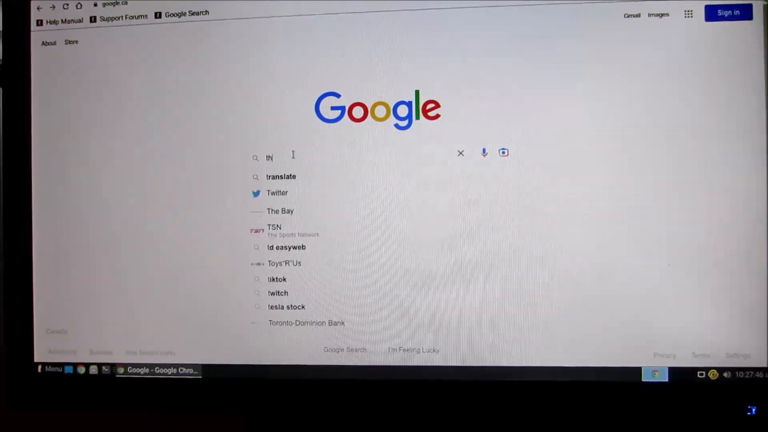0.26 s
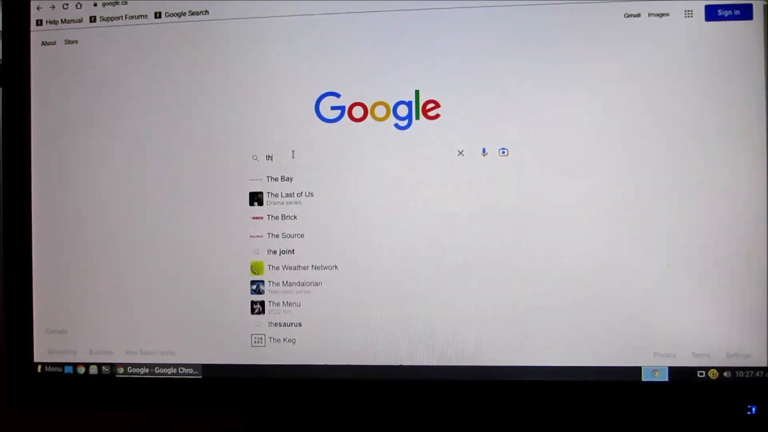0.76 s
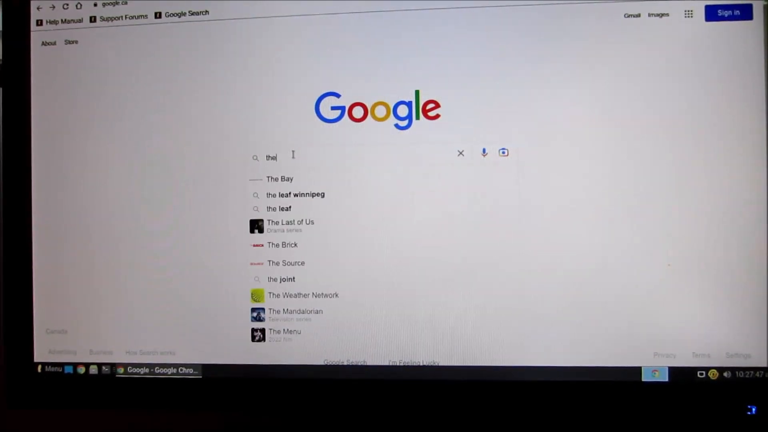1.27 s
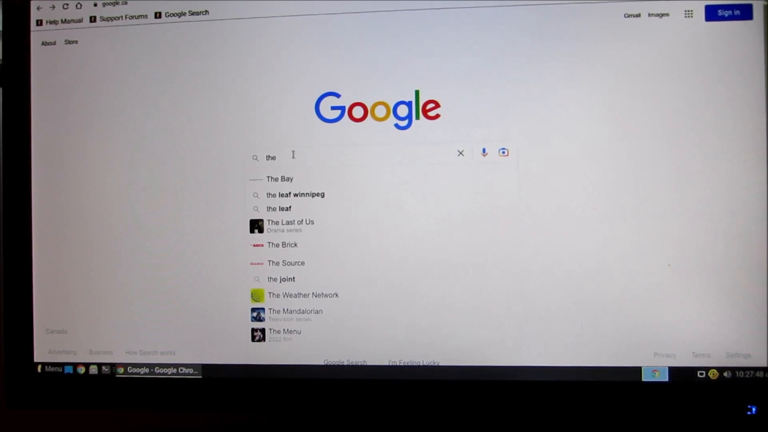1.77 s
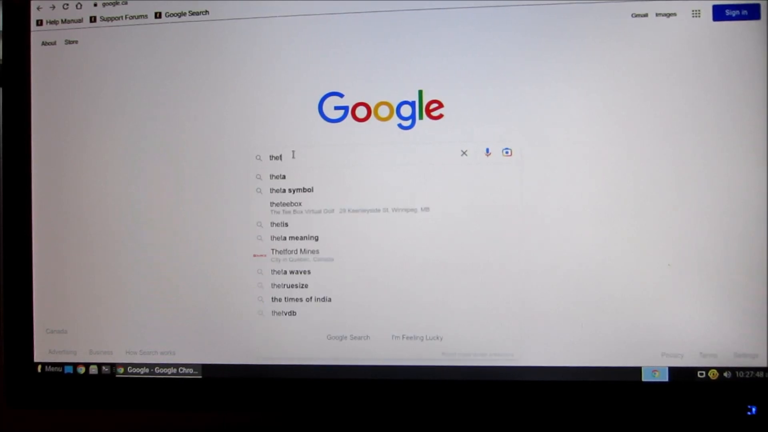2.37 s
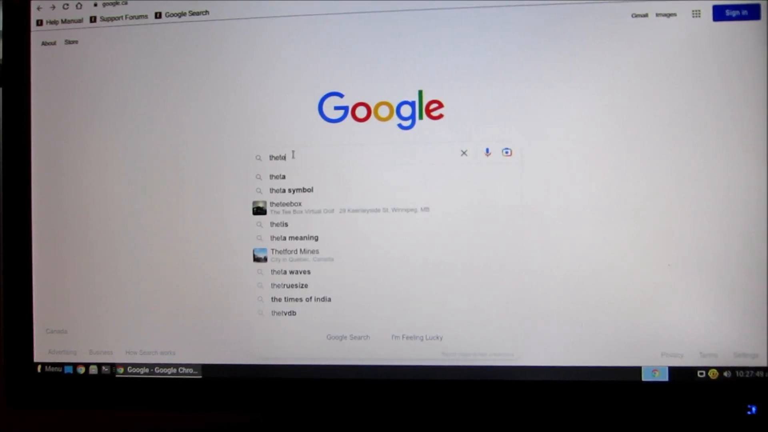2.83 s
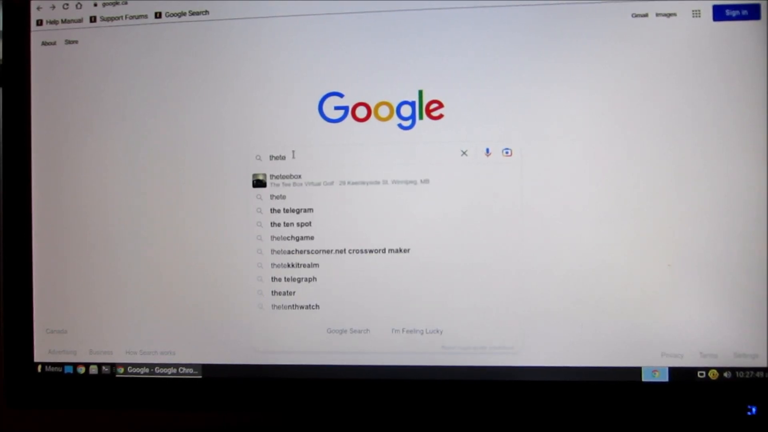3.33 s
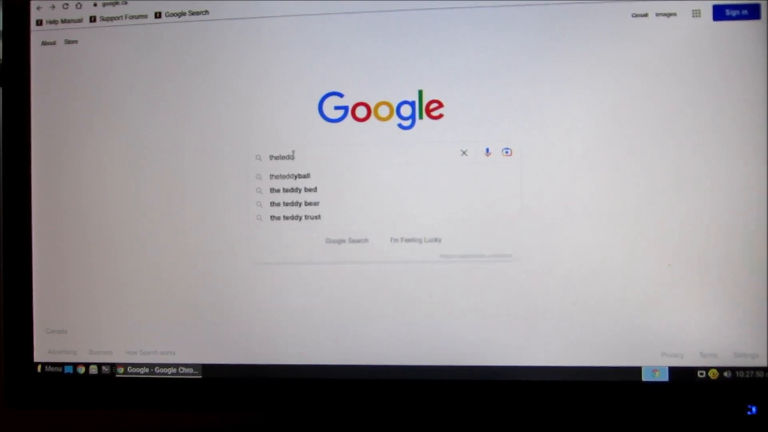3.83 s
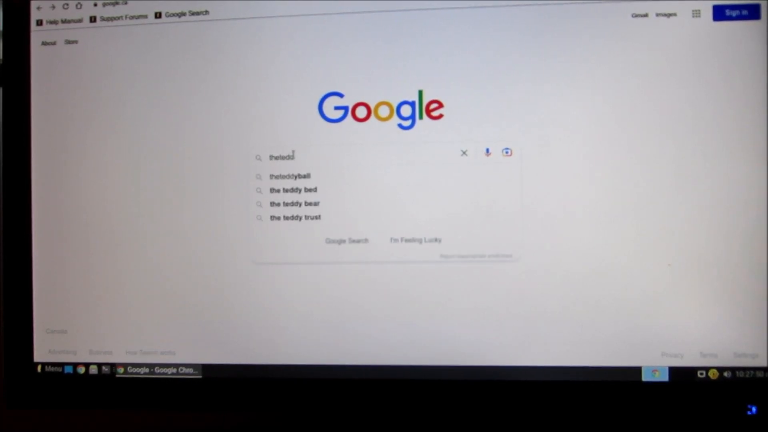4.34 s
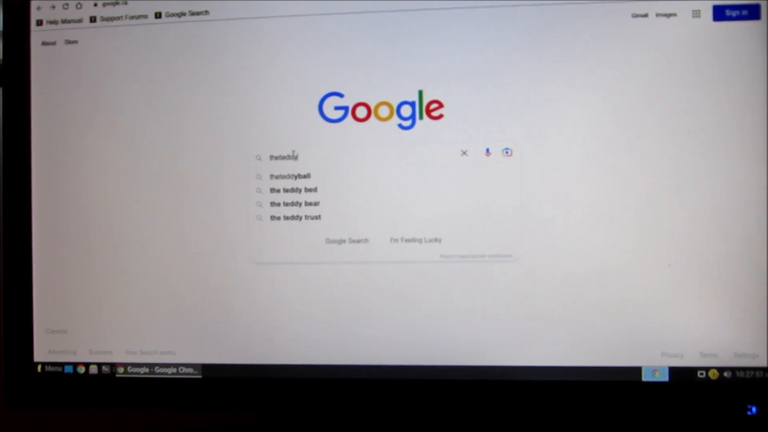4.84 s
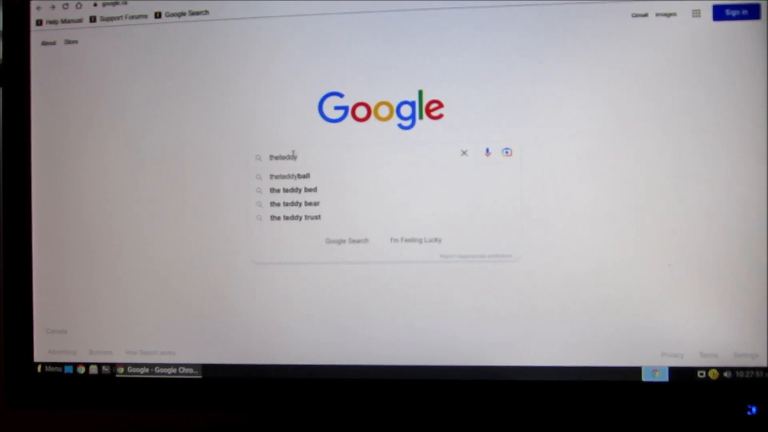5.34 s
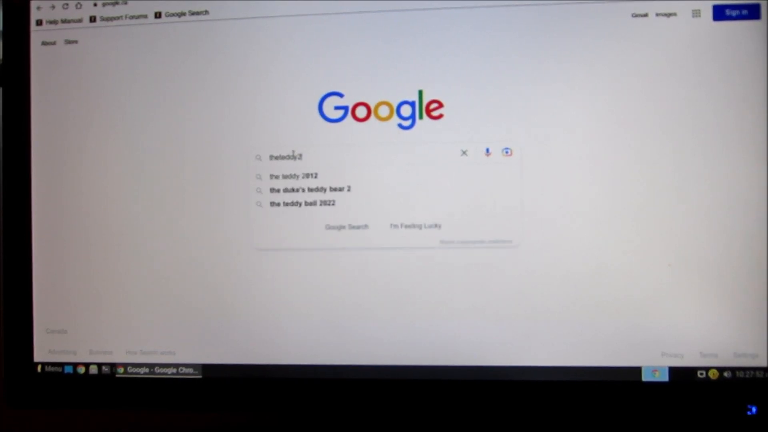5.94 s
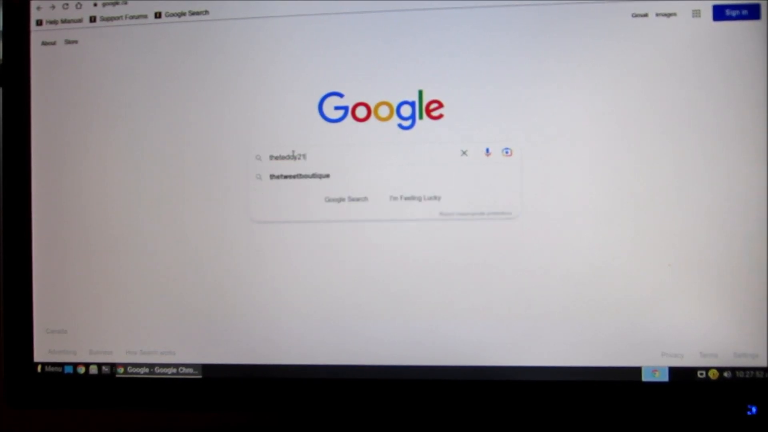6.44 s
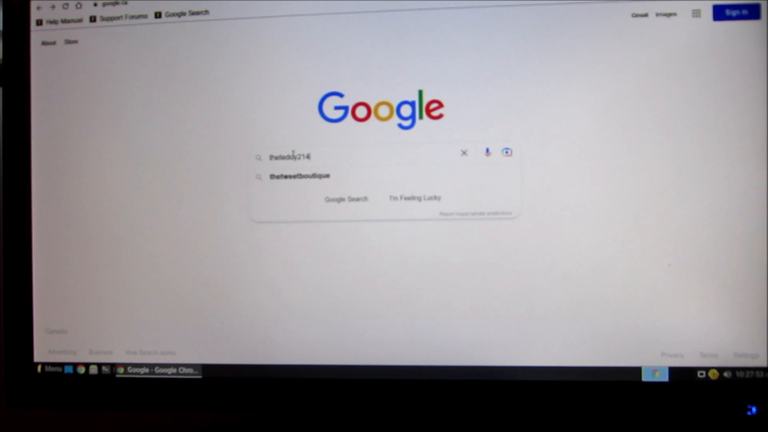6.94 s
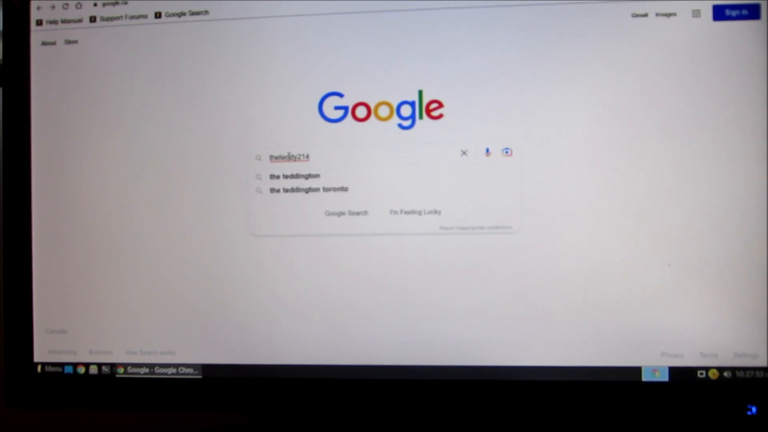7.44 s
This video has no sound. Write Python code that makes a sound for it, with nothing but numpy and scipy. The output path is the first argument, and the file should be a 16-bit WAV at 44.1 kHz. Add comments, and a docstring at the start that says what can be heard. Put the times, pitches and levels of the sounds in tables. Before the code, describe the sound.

Slow, uneven typing indoors: short plastic clacks, each booming faintly through the desk and followed about a tenth of a second later by a fainter release click. About one second in, something bumps the desk in a rapid stutter, thudding and rattling louder than the keys. Long gaps expose low fan noise, faint hiss and hum. Close, dry and slightly left of centre.

```python
"""Slow typing and a knocked desk

One finger types slowly on a plastic keyboard on a desk in a small room, with a computer fan running.
Each key is a sum of decaying case and cap modes with a noise tick; desk modes add a thump, and about
a tenth of a second later the key returns with a softer clack. Near the start something bumps the desk
and judders in a few near-even slips: a dull, louder knock of low modes, with loose parts rattling.
Fan and hiss are spectrally shaped noise; hum and whine are sines of wandering phase."""
import sys
import numpy as np
from scipy import signal
from scipy.fft import rfft, irfft
from scipy.io import wavfile

SR = 44100
rng = np.random.default_rng(int(sys.argv[2]) if len(sys.argv) > 2 else 0)


def log_audio(samples):
    """Write samples as a 16-bit WAV file to the path given in sys.argv[1]."""
    # one column per channel
    frames = np.atleast_2d(samples).T
    # limit to full scale, then quantise
    limited = np.clip(frames, -1, 1)
    pcm = np.round(limited * 32767).astype(np.int16)
    wavfile.write(sys.argv[1], SR, pcm)


N = 339570
BLOW = np.arange(int(.7 * SR)) / SR  # time axis of one blow, s

# Keystrokes, timed at bottoming out; the lead is how long before that the finger is heard meeting the cap
# (0 = unheard): t/s, case level/dB, cap level/dB, tick level/dB, case centre f/Hz, left-right level/dB,
# thump level/dB, sway level/dB, lead t/s, held t/s, return level/dB
KEYSTROKES = [(.166, -47, -53, -66, 1300, 2, -45.5, -57, 0, .101, -62),
              (0.1956, -45.5, -54.5, -63.5, 1000, 3, -72, -56, 0, 0.092, -54),
              (0.8234, -47.5, -48.5, -58.5, 1220, 3.5, -43, -49, 0.0047, 0.083, -55),
              (2.131, -49, -63, -61.5, 905, 3, -47.5, -49.5, 0.003, 0.099, -55),
              (2.7211, -46.5, -47, -54.5, 1390, 3, -41.5, -52, .027, 0.099, -53.5),
              (3.4684, -48, -51, -52.5, 1160, 4.5, -39.5, -50, 0.016, .1, -62),
              (3.6574, -49.5, -48, -51, 1216, 5.5, -39.5, -54, 0.014, .1096, -63),
              (4.7268, -49.5, -53, -58, 1510, 6.5, -48, -48.5, 0.0048, .1, -57),
              (5.6861, -44, -51, -65, 1470, 2.5, -39, -57, 0.009, 0.086, -61),
              (6.226, -54, -59.5, -66, 1000, 5, -43.5, -59, 0.0031, 0.1, -58),
              (6.804, -49.5, -52, -64, 1230, 4, -51.5, -59, 0, .1, -50.5)]
# Sharp tick of plastic on plastic, relative spectral density: f/Hz, level/dB per Hz
TICK_SPECTRUM = [(1500, -32), (3500, 4), (4800, -2), (5500, -1), (6200, 0.5), (7000, 1.5), (8000, -4),
                 (10000, -18), (12000, -35), (14000, -26)]


def key_clacks():
    """Impact and release: the finger meets the cap, drives it to the bottom, holds it and lets it spring back."""
    # one last light tap: t/s, case level/dB, cap level/dB, tick level/dB, case centre f/Hz, left-right level/dB
    light_tap = (7.368, -52, -65, -71, 1280, -1)
    touch_db, touch_tick_db = -9, -13  # first touch against the stroke: softer ring, still softer tick
    out = np.zeros((2, N))
    for s, case_db, cap_db, tick_db, centre_hz, left_db, _, _, lead_s, held_s, return_db in KEYSTROKES:
        add(out, s, clack(case_db, cap_db, tick_db, centre_hz, left_db))
        # cap and tick of the return are relative to its case
        key_return = clack(case_db=0, cap_db=-6.5, tick_db=-13.5, centre_hz=1000, left_db=5)
        add(out, s + held_s, from_db(return_db) * key_return)
        if lead_s > 0:
            touch = clack(case_db + touch_db, cap_db + touch_db, tick_db + touch_tick_db, centre_hz, left_db)
            add(out, s - lead_s, touch)
    add(out, light_tap[0], clack(*light_tap[1:]))
    return room(out, wet_db=-8, build_s=0.003)


def clack(case_db, cap_db, tick_db, centre_hz, left_db):
    """Modal excitation: a landing cap ticks, seats and rocks; the case rings most near the key's own centre."""
    # keyboard case modes: f/Hz, level/dB, t60/s
    case_modes = [(492, -1.5, 0.03), (615, -4, 0.034), (842, -3.5, 0.028), (1018, -3, 0.031),
                  (1150, -9.5, 0.076), (1320, -1.5, 0.034), (1373, -5, 0.044), (1510, -21, 0.035),
                  (1685, -2, 0.024)]
    # key cap modes: f/Hz, level/dB, t60/s
    cap_modes = [(1857, -6.5, 0.041), (2130, -1, 0.029), (2357, 1, 0.028), (2627, -6, 0.032),
                 (3130, -11.5, 0.029), (3470, -11, 0.02)]
    # bright crack that starts the tick, relative spectral density: f/Hz, level/dB per Hz
    crack_spectrum = [(1500, -25), (3500, 0), (6400, 2), (9000, -9), (12000, -32), (14500, -25)]
    crack_db, crack_t60 = 4, .0075  # dB relative to the tick, s

    # modes lose 10 dB one octave from the centre, growing with the square of the distance
    modes = [(hz, db - 10.0 * np.log2(hz / centre_hz) ** 2, t60) for hz, db, t60 in case_modes]
    out = np.zeros((2, len(BLOW)))
    for s, db in [(0, 0), (0.00352, -3.5), (.014, -10)]:  # landing, seating, rocking: s, dB
        ring = hard_blow(modes, detune=0.022, vary_db=1.2, apart=0.24, rise_s=0.00057)
        add(out, s, from_db(case_db + db) * ring)
    cap = from_db(cap_db) * hard_blow(cap_modes, detune=0.037, vary_db=1.5, apart=0.44, rise_s=0.00065)
    tick = burst(TICK_SPECTRUM, t60=0.017, tail_db=-5.5, tail_t60=.08)
    noise = rng.standard_normal((2, len(BLOW)))
    crack = from_db(crack_db) * colour(noise, crack_spectrum) * fade(crack_t60)
    return (out + cap + from_db(tick_db) * (tick + crack)) * panned(left_db)


def key_thumps():
    """Structure-borne sound: each stroke makes the desk boom and sway; the lifting finger booms it faintly."""
    # desk modes under the keyboard: f/Hz, level/dB, t60/s
    desk_modes = [(118.3, -4, 0.71), (134.6, -6.5, 0.14), (164, -4, 0.23), (181.4, -19, 0.23),
                  (264.3, -12, 0.35)]
    # slow sway of the desk on its legs: f/Hz, level/dB, t60/s
    sway_modes = [(59.7, -5.5, 1), (76.4, -14, .3)]
    boom_lag_s, sway_lag_s = 0.00407, 0.011  # after bottoming out
    lift_db = -12  # relative to the stroke's thump
    out = np.zeros((2, N))
    boom = soft_blow(desk_modes, contact_hz=332, radiate_hz=96)
    sway = soft_blow(sway_modes, contact_hz=110, radiate_hz=44.8)
    for s, *_, thump_db, sway_db, _, held_s, _ in KEYSTROKES:
        add(out, s + boom_lag_s, from_db(thump_db) * boom)
        add(out, s + sway_lag_s, from_db(sway_db) * sway)
        add(out, s + held_s, from_db(thump_db + lift_db) * boom)
    return out * panned(1.0)


def knock_thuds():
    """Stick-slip: a grazing slip, slightly weakening full slips to a hard stop, then fast-dying after-shakes."""
    # heavy, low modes of the bumped furniture: f/Hz, level/dB, t60/s
    thud_modes = [(128, -15, .12), (171, -7.5, .075), (201, -6.5, 0.091), (227, -3.5, 0.097),
                  (249.8, -8.5, 0.16), (276, -23.5, .2), (370, -14.5, .09), (416, -24, 0.18)]
    stop_s, stop_slip_db = .9788, -26  # time and level of the last full slip, slip 0
    slip_s, jitter_s = .0245, 0.00057  # spacing of the slips, unevenness of every contact
    weaken_db, settle_db = 0.7, 17  # loss per slip: before the stop, after it
    graze_db, stop_db = -7.5, 8  # change of the first slip, extra of the hard stop
    rebound_s, rebound_loss_db = 0.00754, 2.5  # spacing, loss per rebound
    out = np.zeros((2, N))
    thud = soft_blow(thud_modes, contact_hz=344, radiate_hz=115)
    for slip in range(-3, 3):
        slip_db = stop_slip_db + min(-weaken_db * slip, -settle_db * slip) + graze_db * (slip == -3)
        for rebound in range(3):  # the slip itself, then two rebounds
            db = slip_db - rebound_loss_db * rebound + stop_db * (slip == rebound == 0)
            s = stop_s + slip_s * slip + rebound_s * rebound + jitter_s * rng.standard_normal()
            add(out, s, from_db(db) * thud)
    return room(out * panned(1.3), wet_db=-14, build_s=0.026)


def knock_rattle():
    """Repeated micro-impacts: while the judder lasts, loose parts chatter unevenly and the surface is scuffed."""
    # loose, light parts: f/Hz, level/dB, t60/s
    loose_modes = [(657, 1.5, 0.078), (765, -2, 0.037), (973, -1, 0.031), (1240, 1, 0.047),
                   (1370, 1.5, 0.042), (1596, 0.5, 0.07), (1664, -3, 0.088), (2094, -5.5, 0.062),
                   (2630, -20, 0.078)]
    # how hard the knock shakes and scuffs: t/s, rattle level/dB before the trim below, scuff level/dB
    shake = [(0.902, -58, -76), (0.914, -49, -75), (0.938, -44, -63.5), (0.956, -43, -73),
             (0.97, -36.5, -69), (0.99, -43, -67), (1.0, -51, -73)]
    rattle_trim_db = -6.5
    contacts_per_s = 260
    out = np.zeros((2, N))
    times, rattle_db, scuff_db = np.transpose(shake)
    for due in np.arange(times[0], times[-1], 1 / contacts_per_s):
        s = due + rng.uniform(-.5, .5) / contacts_per_s
        rattle = hard_blow(loose_modes, detune=0.028, vary_db=0.5, apart=0.16, rise_s=.001)
        scuff = burst(TICK_SPECTRUM, t60=.04, tail_db=-12, tail_t60=0.11)
        rattle = from_db(rattle_trim_db + np.interp(s, times, rattle_db)) * rattle
        scuff = from_db(np.interp(s, times, scuff_db)) * scuff
        add(out, s, rattle + scuff)
    return room(out * panned(4.0), wet_db=-8, build_s=0.0058)


def computer():
    """Broadband and tonal noise: fan rush, faint hiss, and hum and whine whose phase walks at random."""
    # fan and room air, relative spectral density: f/Hz, level/dB per Hz
    fan_spectrum = [(12, -39), (20, 0), (38, -9), (87, -8.5), (121, -5.5), (144, -5), (253, -6.5),
                    (354, -9), (549, -10), (649, -9.5), (947, -14.5), (1190, -11), (2240, -18.5),
                    (2430, -23.5), (3000, -27.5), (3900, -61), (6600, -120)]
    # resonances that colour the rush: f/Hz, width f/Hz, level/dB
    fan_peaks = [(262, 56, 4.5), (1186, 91, 2), (1398, 100, -3), (1690, 68, 5.5), (1934, 380, -4),
                 (2187, 230, 3.5)]
    # fine hiss above it, relative spectral density: f/Hz, level/dB per Hz
    hiss_spectrum = [(1760, -26), (3000, -5.5), (3170, -0.5), (3450, -5), (3830, -3), (4310, -7),
                     (6090, -9), (7250, -10.5), (10300, -19), (12000, -35.5), (13400, -23), (15100, -18.5),
                     (15800, -23.5)]
    # steady tones: f/Hz, rms level/dB
    tones = [(30, -74), (59.5, -82), (120, -67), (1394, -71.5), (3289, -82), (4738, -89.5)]
    out = steady_noise(fan_spectrum, -56, fan_peaks) + steady_noise(hiss_spectrum, -72, [])
    time = np.arange(N) / SR
    for hz, db in tones:
        # phase drifts 2.71 rad rms in one second, independently on each side
        wander = np.cumsum(rng.standard_normal((2, N)), axis=1) * 2.71 / np.sqrt(SR)
        out = out + from_db(db) * np.sqrt(2) * np.sin(2 * np.pi * hz * time + wander)
    return out


def steady_noise(spectrum, level_db, peaks):
    """Partial coherence: mid and side noises set the likeness of the sides; the level is the mid channel's rms."""
    # left-right correlation of the background: f/Hz, likeness (-1 to 1)
    likeness = [(30, -0.5), (120, -0.63), (280, -0.27), (640, -0.71), (1400, -0.48), (3100, -0.48),
                (6800, 0.057), (15000, .1)]
    # left-right balance of the background: f/Hz, level/dB
    balance = [(30, -1), (120, -1.5), (280, 0), (640, -0.5), (1400, -5), (2800, -2), (5600, -0.3),
               (15000, .5)]
    hz = np.fft.rfftfreq(N, 1 / SR)
    shape_db = at_hz(spectrum, hz)
    for centre, width, db in peaks:
        shape_db = shape_db + db / (1 + (2 * (hz - centre) / width) ** 2)
    alike = np.clip(at_hz(likeness, hz), -.95, .95)
    white = rfft(rng.standard_normal((2, N)))
    mid, side = white * from_db(shape_db) * np.sqrt([1 + alike, 1 - alike])
    lean = from_db(at_hz(balance, hz) / 2)
    sides = irfft(np.array([(mid + side) * lean, (mid - side) / lean]), N)
    return from_db(level_db) * sides / np.std(irfft(mid, N))


def room(x, wet_db, build_s):
    """Diffuse reverberation: a noise tail, different on each side, builds up and dies band by band."""
    # reverberation time: f/Hz, t60/s
    room_t60 = [(100, 0.33), (400, 0.18), (1500, 0.25), (6000, 0.17), (15000, 0.24)]
    tail, edges = 0, np.geomspace(70, 16000, 9)
    for low, high in zip(edges, edges[1:]):
        band_pass = signal.butter(2, [low, high], "band", fs=SR, output="sos")
        band = signal.sosfilt(band_pass, rng.standard_normal((2, len(BLOW))))
        tail = tail + band * fade(at_hz(room_t60, np.sqrt(low * high)))
    tail = tail * (1 - np.exp(-BLOW / build_s))
    tail = tail / np.sqrt(np.sum(tail[0] ** 2))
    return x + from_db(wet_db) * signal.fftconvolve(x, tail, axes=1)[:, :N]


def hard_blow(modes, detune, vary_db, apart, rise_s):
    """Modal sum in stereo: each blow varies its light modes' pitch and strength, out of step on the two sides."""
    out = 0
    for hz, db, t60 in modes:
        tune, strength, step = rng.standard_normal(3)
        phase = 2 * np.pi * (hz * (1 + detune * tune) * BLOW + rng.random())
        sides = phase + apart * step * np.array([[1], [-1]])
        out = out + from_db(db + vary_db * strength) * fade(t60) * np.sin(sides)
    out = out * (1 - np.exp(-BLOW / rise_s))
    return out / np.sqrt(np.mean(out[:, BLOW < .01] ** 2))  # unit rms over the first 10 ms


def soft_blow(modes, contact_hz, radiate_hz):
    """Soft contact low-passes the push on low modes; a panel this small moves no air in the deepest bass."""
    sound = sum(from_db(db) * fade(t60) * np.cos(2 * np.pi * hz * BLOW) for hz, db, t60 in modes)
    sound = signal.sosfilt(signal.butter(3, contact_hz, fs=SR, output="sos"), sound)
    return signal.sosfilt(signal.butter(3, radiate_hz, "high", fs=SR, output="sos"), sound)


def burst(spectrum, t60, tail_db, tail_t60):
    """Two-rate decay: stereo chatter of tiny contacts dies fast and leaves a fainter, longer tail."""
    noise = colour(rng.standard_normal((2, len(BLOW))), spectrum)
    return noise * (fade(t60) + from_db(tail_db) * fade(tail_t60))


def fade(t60):
    """Exponential damping: the envelope of one blow falls 60 dB in t60 seconds."""
    return np.exp(-np.log(1000) * BLOW / t60)


def colour(x, spectrum):
    """Spectral shaping: white noise takes on a spectrum while its expected power is kept."""
    gain = from_db(at_hz(spectrum, np.fft.rfftfreq(x.shape[-1], 1 / SR)))
    return irfft(rfft(x) * gain / np.sqrt(np.mean(gain ** 2)), x.shape[-1])


def from_db(db):
    """Logarithmic level: decibels to amplitude gain."""
    return 10 ** (np.asarray(db) / 20)


def at_hz(points, hz):
    """Linear interpolation of a table on a log-frequency axis."""
    freqs, values = np.transpose(points)
    return np.interp(np.log(np.maximum(hz, 1)), np.log(freqs), values)


def add(out, s, sound):
    """Superposition: mix a sound in at time s."""
    start = max(round(s * SR), 0)
    out[:, start:start + sound.shape[-1]] += sound[..., :out.shape[-1] - start]


def panned(left_db):
    """Interaural level difference: gains of the two channels, left_db apart."""
    return from_db(np.array([[left_db], [-left_db]]) / 2)


def from_the_left(x, count):
    """Interaural time difference: the sound reaches the right side count samples late."""
    return np.array([x[0], np.pad(x[1], (count, 0))[:N]])


def scene():
    """Superposition: keys and knock, arriving first on the left, over the computer's steady noise."""
    keys = key_clacks() + key_thumps()
    knock = knock_thuds() + knock_rattle()
    return from_the_left(keys + knock, count=3) + computer()


def record(dry):
    """Band limiting: a steep elliptic low-pass cuts the top above 15.8 kHz."""
    return signal.sosfilt(signal.ellip(10, .1, 80, 15800, fs=SR, output="sos"), dry)


dry = scene()
out = record(dry)
log_audio(out)
```